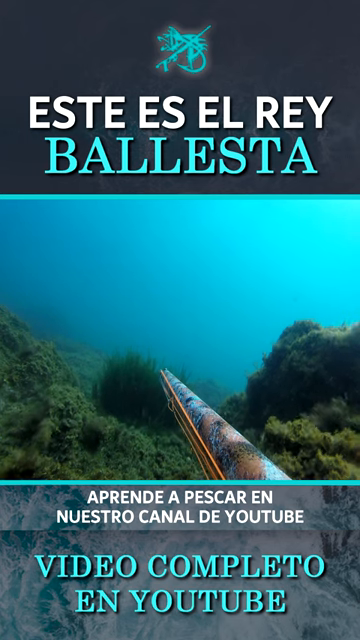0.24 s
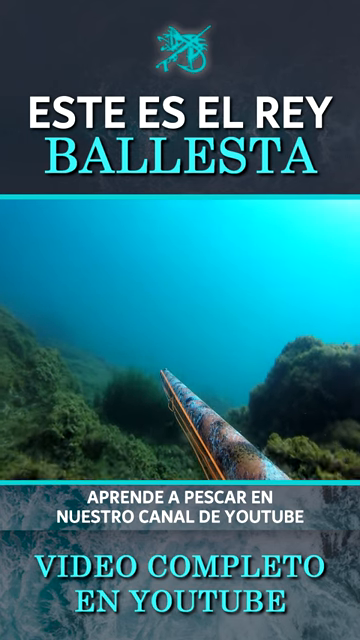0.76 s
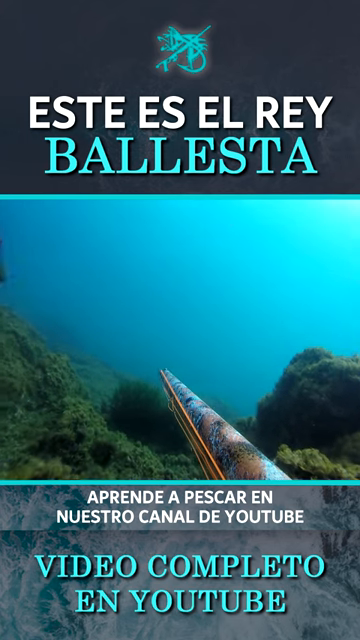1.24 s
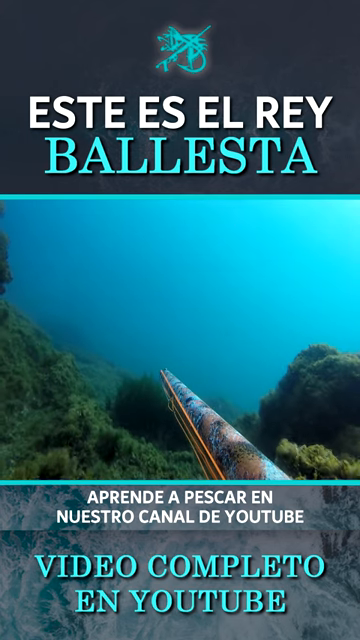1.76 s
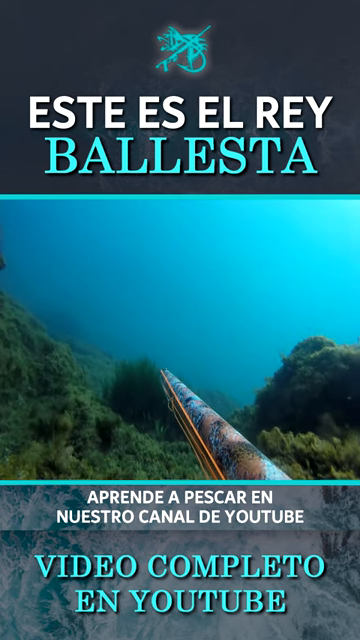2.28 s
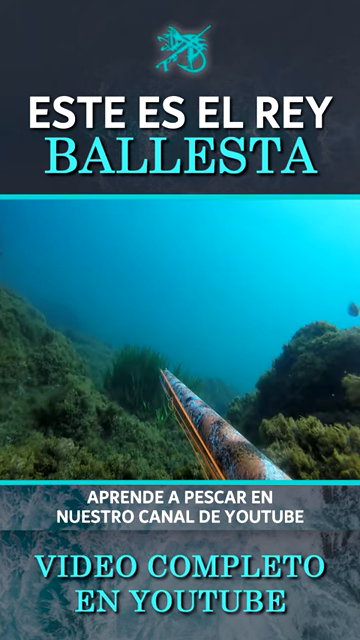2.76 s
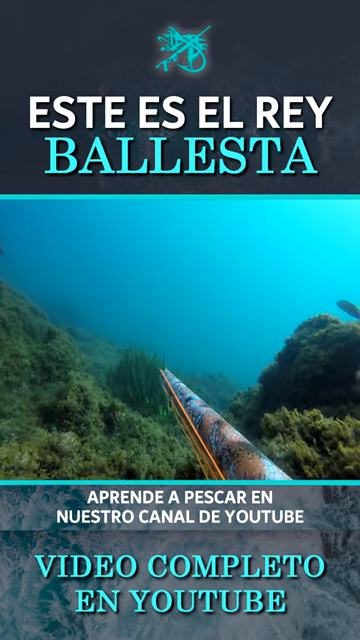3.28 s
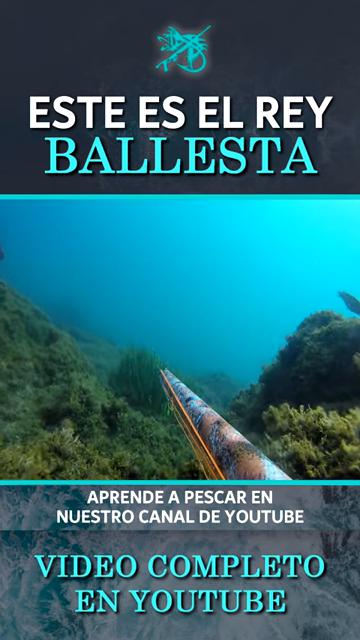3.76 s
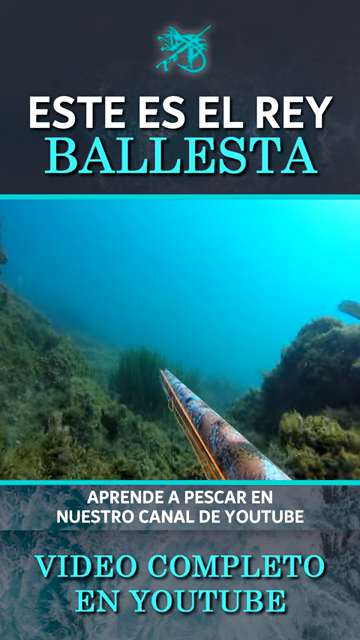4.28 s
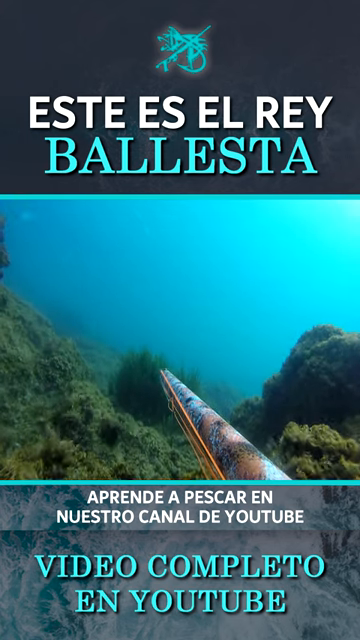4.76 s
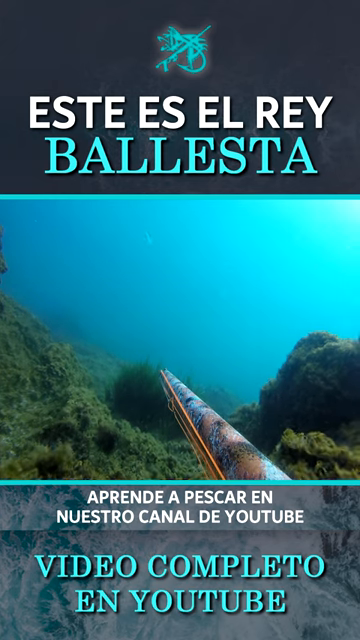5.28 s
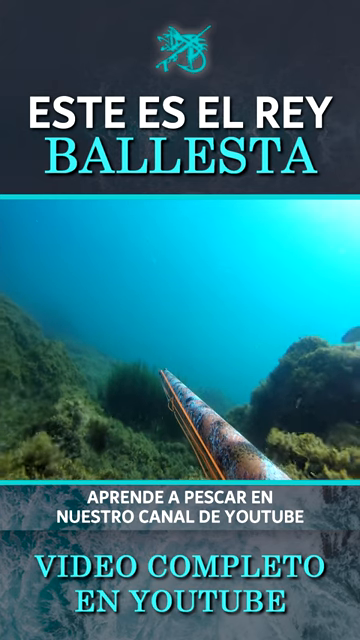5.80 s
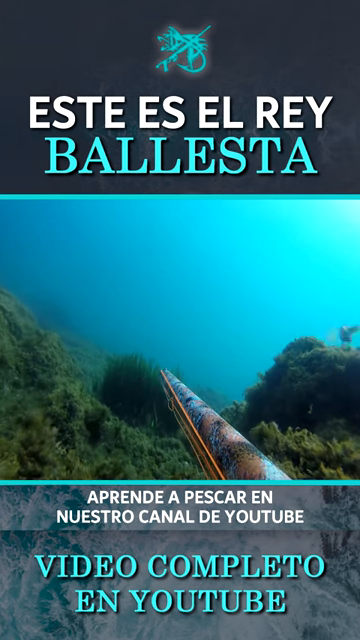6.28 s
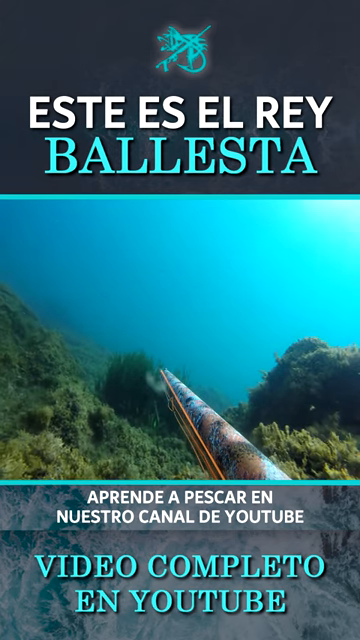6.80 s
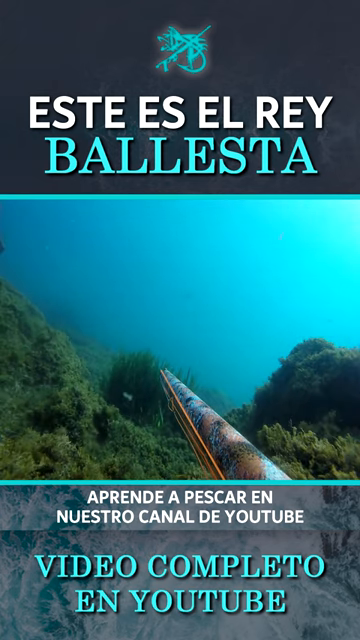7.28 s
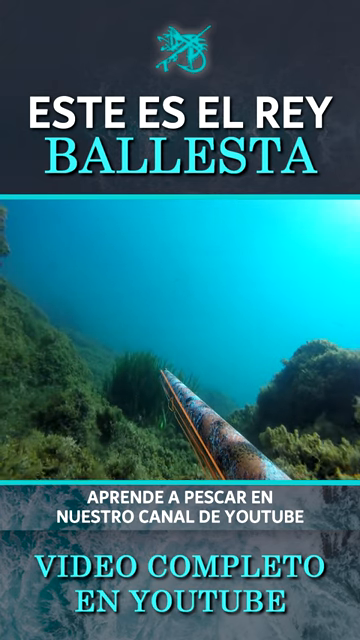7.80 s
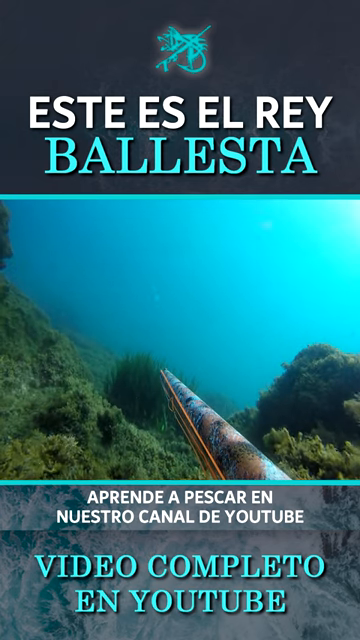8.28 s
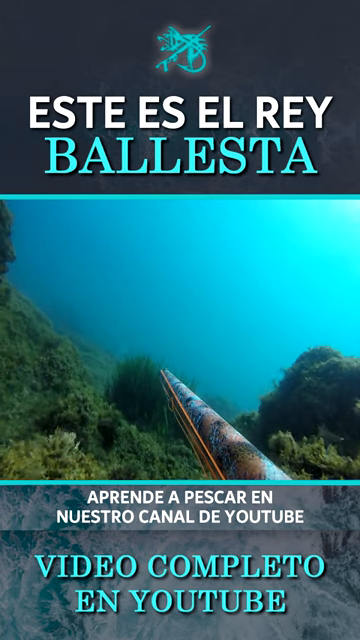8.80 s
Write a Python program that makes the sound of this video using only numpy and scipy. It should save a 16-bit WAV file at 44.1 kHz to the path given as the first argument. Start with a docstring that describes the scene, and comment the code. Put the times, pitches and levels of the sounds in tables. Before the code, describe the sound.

Underwater reef ambience: steady soft hiss and fine crackle, scattered sharp shrimp snaps, two hard dry cracks, dull handling knocks and low rumble.

```python
"""Snapping shrimp click near and far on a weedy reef, heard under water through a camera housing.
Each snap is a sharp pulse with smeared noise behind it, which rings the housing's resonances;
the far snaps merge into a crackling hiss. The housing sits on a speargun that is held ready:
the hand knocks and rubs on it, its stretched bands twang low and its barrel sways.
Slow filtered noise makes the rumble of moving water, and shaped steady noise the hiss of the sea."""
import sys
import numpy as np
from scipy import signal
from scipy.fft import rfft, irfft, next_fast_len
from scipy.io import wavfile

SR = 44100
rng = np.random.default_rng(int(sys.argv[2]) if len(sys.argv) > 2 else 0)


def inscribe(sig):
    """Save sig as 16-bit PCM at rate SR to the path in sys.argv[1].

    A 1-D sig is mono; a 2-D sig holds one channel per row.
    Samples are clipped to [-1, 1] before scaling.
    """
    pcm = np.round(np.clip(np.atleast_2d(sig).T, -1, 1) * 32767)
    wavfile.write(sys.argv[1], SR, pcm.astype(np.int16))


N = 399105
TIME = np.arange(N) / SR

# ways the speargun's body and stretched bands vibrate, lowest first:
# (pitch f/Hz, relative level/dB, time to fade by 60 dB t60/s)
GUN = [(74.84, 1.5, 0.6), (149, -5.5, 0.11), (228, -3, 0.12), (372, -5, 0.1), (516, -17.5, 0.027),
       (690, -3, 0.054), (768, -9, 0.12), (890, -36, 0.013)]
# hand movements that shift the gun:
# (start t/s, length/s, relative level of rubbing/dB, relative level of stirred water/dB)
MOVES = [(0, 0.079, -43.5, -33), (0.271, 0.14, -52.5, -43.5), (0.527, 0.096, -56.5, -40.5),
         (0.707, .2, -51.5, -46), (1.253, .35, -74, -52), (2.456, 0.038, -48, -37),
         (2.542, 0.095, -59, -36), (3.446, 0.59, -72, -48.5), (4.03, 0.14, -62, -43.5),
         (4.245, 0.26, -67, -51.5), (6.473, 0.099, -55, -47), (7.38, .25, -63.5, -49.5)]


def from_db(db):
    """Turn decibels into a gain."""
    return 10 ** (np.asarray(db) / 20)


def rms_one(x):
    """Scale a steady sound to an rms (average strength) of 1."""
    return x / np.sqrt(np.mean(x ** 2) + 1e-20)


def unit_burst(x):
    """Scale a short sound to the energy of ten milliseconds at rms 1."""
    return x / np.sqrt(np.sum(x ** 2) / (.01 * SR) + 1e-20)


def add(out, s, sound):
    """Mix a sound in at time s, in seconds."""
    i = int(np.clip(round(s * SR), 0, N - 1))
    out[i:i + len(sound)] += sound[:N - i]


def butter(x, hz, kind, order=2):
    """Butterworth filter: keeps a range of pitches and fades the rest."""
    return signal.sosfilt(signal.butter(order, hz, kind, fs=SR, output="sos"), x)


def resonate(x, hz, width):
    """One resonance with gain 1 at its peak; the narrower it is (in Hz), the longer it rings."""
    r = np.exp(-np.pi * width / SR)
    feed = np.array([1, 0, -1]) * (1 - r * r) / 2
    feedback = [1, -2 * r * np.cos(2 * np.pi * hz / SR), r * r]
    return signal.lfilter(feed, feedback, x)


def coloured_noise(spectrum):
    """Steady noise with the given balance of pitches, at rms 1."""
    hz, db = np.transpose(spectrum)
    size = next_fast_len(N, True)
    bins = np.maximum(np.fft.rfftfreq(size, 1 / SR), 1)
    gain = from_db(np.interp(np.log(bins), np.log(hz), db))
    return rms_one(irfft(rfft(rng.standard_normal(size)) * gain, size)[:N])


def housing(x, low=0, high=SR):
    """Water pressure rings the housing's resonances from low to high Hz; water keeps each ring short."""
    # resonances of the camera housing: (pitch f/Hz, width/Hz, relative level/dB)
    resonances = [(806, 99, 11.5), (1488, 27, 11.5), (1666, 65, 7), (1851, 140, 15), (2235, 200, 13.5),
                  (2436, 118, 13), (2674, 59.5, 19), (2750, 77, -35), (2950, 30, -35), (3360, 67, -29),
                  (4280, 430, 1.5), (4530, 760, -16), (4930, 160, -7), (6000, 300, -20), (7440, 1370, -3.5),
                  (7300, 2800, -9), (8500, 930, -34.5), (10400, 590, -14), (12000, 940, -12)]
    least_width_hz = 85
    ringing = sum(from_db(db) * resonate(x, hz, max(width, least_width_hz))
                  for hz, width, db in resonances if low <= hz < high)
    return butter(butter(ringing, 600, "high"), 13000, "low")


def crackle(per_s, size_db, largest, echo_t60, steady_power):
    """Noise whose power jumps at each random snap and then fades, over a steady floor."""
    size = from_db(size_db * np.minimum(rng.exponential(1, N), largest))
    snaps = (rng.random(N) < per_s / SR) * size
    # power that falls a millionfold in t60 is a fade of 60 dB
    power = signal.lfilter([1], [1, -from_db(-120 / (echo_t60 * SR))], snaps ** 2 + steady_power)
    return np.sqrt(power) * rng.standard_normal(N)


def far_shrimp(per_s=55, murmur=0.34, top_hz=7500, level_db=-58):
    """Distant snaps of uneven size, dulled by the water, each with a short echo over the merged chorus."""
    snaps = crackle(per_s, size_db=2.5, largest=3.1, echo_t60=0.063, steady_power=murmur * per_s / SR)
    return from_db(level_db) * rms_one(butter(housing(snaps), top_hz, "low"))


def fine_ticks(low_hz=5500, top_hz=11000, level_db=-76):
    """Tiny bright snaps in the weed close by, each dying away very quickly."""
    snaps = crackle(per_s=22, size_db=4.0, largest=5.6, echo_t60=.018, steady_power=1e-18)
    return from_db(level_db) * rms_one(butter(housing(snaps), [low_hz, top_hz], "band"))


def sea_hiss(level_db=-56.0):
    """The smooth, steady hiss of the sea is noise that weakens towards the treble."""
    # balance of the hiss: (pitch f/Hz, relative level in each Hz/dB)
    sea_spectrum = [(20, -5.5), (45, 1.5), (75, -0.5), (110, -2), (220, -5), (400, -8.5), (620, -11.5),
                    (790, -10.5), (1050, -15), (2700, -20), (5000, -26.5), (8200, -30), (11300, -37),
                    (15000, -42.5)]
    return from_db(level_db) * coloured_noise(sea_spectrum)


def gesture(start, length, t60):
    """Strength of one movement: it swells up to its start, holds for its length, then dies away."""
    attack_s = 0.034
    attack = np.clip(1 + (TIME - start) / attack_s, 0, 1)
    return attack * from_db(-60 * np.clip((TIME - start - length) / t60, 0, 2))


def rumble(flow_db=-1, calm_db=-58.5, settle_t60=.65):
    """Slow eddies press on the housing; each movement stirs up more of them, and they settle slowly."""
    eddies = rms_one(butter(rng.standard_normal(N), [12, 26], "band"))
    stirred = sum((from_db(push_db) * gesture(s, length, settle_t60)) ** 2
                  for s, length, rub_db, push_db in MOVES)
    # calm and stirred eddies add up as powers
    strength = np.sqrt(from_db(calm_db) ** 2 + stirred)
    return from_db(flow_db) * strength * eddies


def gun_modes(force):
    """A force on the gun sets each of its modes (ways of vibrating) ringing, lowest first."""
    return [resonate(force, hz, np.log(1000) / (np.pi * t60)) for hz, db, t60 in GUN]


def rubbing(level_db=-2, grain_db=4.0, slips_per_s=500, scrape_db=-2, release_t60=0.17):
    """While the hand moves, the glove slips in tiny jerks that feed the gun's modes and a dull scrape."""
    moments = rng.random(N) < slips_per_s / SR
    slips = moments * from_db(grain_db * rng.standard_normal(N)) * rng.choice([-1, 1], N)
    body = rms_one(sum(from_db(db) * rms_one(mode)
                       for (hz, db, t60), mode in zip(GUN, gun_modes(slips))))
    scrape = from_db(scrape_db) * rms_one(butter(slips, [60, 520], "band", order=1))
    effort = sum(from_db(rub_db) * gesture(s, length, release_t60)
                 for s, length, rub_db, push_db in MOVES)
    return from_db(level_db) * effort * (body + scrape)


def contact(t, length):
    """A brief rough contact: noise that dies away smoothly over about its length."""
    return rng.standard_normal(len(t)) * np.exp(-np.minimum(t / max(length, .001), 6) ** 2)


def knocks(ring_db=-4, thud_db=-1):
    """Brief rough contacts give a dull thud and shake the gun; the stretched bands ring on."""
    # knocks on the gun:
    # (time t/s, relative level/dB, length of contact/s, extra level of the lowest mode/dB)
    knock_list = [(.006, -43, 0.0073, 4), (.045, -46.5, 0.0094, 5.5), (.075, -45, 0.0098, -5),
                  (.775, -59, 0.026, 14.5), (2.446, -35, 0.0047, 0), (2.48, -50, 0.024, 8),
                  (2.536, -45, 0.0035, -19), (2.607, -53.5, 0.0048, 6.5), (4.04, -61, 0.013, 8.5),
                  (6.508, -47.5, 0.016, 4)]
    out, t = np.zeros(N), np.arange(SR * 3 // 4) / SR
    for s, db, length, low_db in knock_list:
        force = contact(t, length)
        thud = unit_burst(butter(force, [110, 950], "band", order=3))
        add(out, s, from_db(db + thud_db) * thud)
        for k, mode in enumerate(gun_modes(force)):
            mode_db = ring_db + db + GUN[k][1] + low_db * (k == 0)
            add(out, s, from_db(mode_db) * 2 * mode / np.abs(mode).max())
    return out


def snap_paths(t, spread, direct=0.24, echo_db=0.5, echo_t60=0.1, usual_spread=0.0078):
    """A collapsing cavity: a sharp pulse, a swelling cluster of paths off the rocks, the reef's echo."""
    # far snaps are more smeared and have more echo
    far = spread / usual_spread
    arrivals = rng.standard_normal(len(t)) * np.sqrt(rng.exponential(1, len(t)))
    cluster = (.65 + .4 * t / spread) * np.exp(-(t / (1.15 * spread)) ** 6)
    echo = from_db(echo_db - 60 * t / echo_t60) * min(far, 1.4) ** 1.7
    pulse = unit_burst(1. * (t == 0))
    return unit_burst(arrivals * (cluster + echo)) + direct * pulse


def near_shrimp(mid_db=-2, mid_follows=0.57):
    """Snaps ring the housing's three registers; brightness lifts the treble fully, the mids by a share."""
    # near snaps: (time t/s, level of the lowest register/dB, treble relative to it/dB,
    # spread of the arriving paths/s)
    snaps = [(0.06, -45, -36, 0.0021), (0.173, -41.5, -16.5, 0.0055), (0.5646, -43, -39, 0.0074),
             (0.7507, -46.5, -18, 0.0039), (1.0024, -44.0, -19, 0.0028), (1.1365, -43.5, -34, 0.0074),
             (1.4465, -43, -23, 0.024), (1.545, -47.5, -28, 0.0108), (1.7227, -45.5, -22, 0.0037),
             (1.7621, -45.0, -20.0, 0.0047), (2.2884, -32, -37, 0.0047), (2.2925, -25, -25.5, 0.0024),
             (2.6366, -41, -25, 0.0041), (2.645, -38, -17.5, 0.0043), (2.691, -53.5, -3.5, 0.0026),
             (2.914, -44, -29, 0.0083), (3.0548, -52.5, 2.5, 0.0016), (3.0743, -48, -4, 0.0088),
             (3.1759, -36.5, -32, 0.0051), (3.2247, -45.5, -8.5, 0.0042), (3.4173, -35, -26.5, 0.0082),
             (3.4855, -47, -18, 0.0025), (3.6703, -46.5, -25, 0.0081), (3.7626, -50.5, -5, 0.0051),
             (4.2965, -39.5, -20.5, 0.0089), (4.347, -43.5, -25, 0.012), (4.8, -48.5, -25, 0.01),
             (5.178, -41, -20.5, 0.011), (5.574, -46, -14, 0.0045), (5.6016, -42, -22, 0.016),
             (5.8686, -46, -23, 0.0115), (5.9138, -44.0, -18, 0.0062), (6.0372, -49.0, -16.0, 0.0051),
             (6.2185, -34.5, -28, 0.0085), (6.387, -48.0, -15, 0.0093), (6.5017, -39, -24, 0.005),
             (6.766, -41.5, -20, 0.0056), (6.8182, -34.5, -25, 0.0059), (6.882, -47, -4, 0.0031),
             (7.1981, -42.5, -10.5, 0.0054), (7.6055, -41.0, -11, 0.0044), (7.667, -46, -22, 0.004),
             (7.8474, -43.5, -21, 0.021), (7.928, -50, -9, 0.0055), (8.1758, -43.5, -35, 0.012),
             (8.2123, -27.5, -28, 0.0041), (8.331, -47.5, -17, 0.0075), (8.4046, -41, -15, 0.0042),
             (8.563, -31, -20.5, 0.0052), (8.6236, -47.5, -15.0, 0.0082), (8.7523, -43, -18.0, 0.014),
             (8.823, -46.0, -13.5, 0.012), (8.9869, -38, -18, 0.006)]
    # borders between the low, middle and treble registers: f/Hz
    edges = [0, 3400, 6000, 20000]
    out, t = np.zeros(N), np.arange(SR // 10) / SR
    for s, db, treble_db, spread in snaps:
        paths = snap_paths(t, max(spread, .001))
        register_db = (0, mid_db + mid_follows * treble_db, treble_db)
        for low, high, rel_db in zip(edges, edges[1:], register_db):
            ringing = butter(housing(paths, low, high), [max(low, 100), high], "band", order=3)
            add(out, s, from_db(db + rel_db) * unit_burst(ringing))
    return out


def barrel_sway(start_hz=33, rest_hz=19.8, slowing_s=0.069, fade_t60=0.58):
    """The pushed long barrel swings, slowing to its resting rate as it dies away."""
    # the push: (time t/s, length/s, level/dB)
    push = (.8, .12, -29)
    s, length, db = push
    hz = rest_hz + (start_hz - rest_hz) * np.exp(-np.maximum(TIME - s, 0) / slowing_s)
    swing = np.sin(2 * np.pi * np.cumsum(hz) / SR)
    return from_db(db) * gesture(s, length, fade_t60) * swing


def cracks(scatter_t60=0.022, peak_width_hz=800, bite_db=3):
    """A single close pulse, a smeared rebound off the gun and a little scatter, with almost no echo."""
    # dry cracks right beside the housing: (time t/s, level/dB, low edge f/Hz, bright peak f/Hz,
    # gain of that peak/dB, top edge f/Hz, delay of the rebound/s, gain of the lobe above the edge/dB)
    crack_list = [(1.6975, -17, 1670, 6600, -2.5, 6360, 0.0012, -24),
                  (5.0105, -21, 200, 4900, -5, 5630, 0.002, -10)]
    out, t = np.zeros(N), np.arange(SR // 10) / SR
    for s, db, low_hz, peak_hz, peak_db, top_hz, delay, lobe_db in crack_list:
        direct = unit_burst(1. * (t == 0))
        scatter = unit_burst(rng.standard_normal(len(t)) * from_db(-60 * t / scatter_t60))
        smear = np.exp(-(2 * (t - delay) / delay) ** 2)
        rebound = unit_burst(rng.standard_normal(len(t)) * smear)
        paths = direct + .28 * scatter + .6 * rebound
        bright = from_db(peak_db) * resonate(paths, peak_hz, peak_width_hz)
        bite = from_db(bite_db) * resonate(paths, 3630, 630)
        # the pulse's width leaves a hollow above its top edge, with a weaker lobe beyond
        pulse = butter(paths + bright + bite, low_hz, "high", order=1)
        pulse = butter(pulse, top_hz, "low", order=8)
        pulse += from_db(lobe_db) * butter(paths, 9000, "high", order=6)
        add(out, s, from_db(db) * unit_burst(housing(pulse)))
    return out


def taps(width_hz=320):
    """Soft contacts knock hollowly and stir mainly the housing's lowest resonances."""
    # dull taps of gear on the housing:
    # (time t/s, level/dB, pitch f/Hz, length of contact/s, ring of the housing relative to the knock/dB)
    tap_list = [(2.725, -49, 470, 0.011, -14), (3.669, -50, 760, .005, -12), (3.901, -50.5, 755, .005, -15),
                (4.087, -50, 780, .003, -12), (4.164, -48, 760, 0.013, -14),
                (4.204, -41.5, 754, 0.014, -10), (4.648, -53.5, 744, .005, -20),
                (7.683, -50, 335, 0.0028, -18), (7.687, -39, 607, 0.0033, -0.5)]
    out, t = np.zeros(N), np.arange(SR // 10) / SR
    for s, db, hz, length, ring_db in tap_list:
        hollow = butter(resonate(contact(t, length), hz, width_hz), 1100, "low", order=3)
        knock = unit_burst(butter(hollow, 830, "low"))
        ring = from_db(ring_db) * unit_burst(housing(hollow))
        add(out, s, from_db(db) * unit_burst(knock + ring))
    return out


def scene():
    """Shrimp, gun handling and moving water over the sea's hiss."""
    shrimp = far_shrimp() + fine_ticks() + near_shrimp() + cracks()
    # the camera mount passes only the dull part of what shakes the gun
    handling = butter(rubbing() + knocks(), 880, "low", order=7)
    water = sea_hiss() + rumble()
    return (shrimp + handling + water + barrel_sway() + taps())[None]


def record(dry):
    """The highest treble is cut off steeply."""
    cutoff_hz = 15400
    return signal.sosfilt(signal.ellip(10, .2, 70, cutoff_hz, fs=SR, output="sos"), dry)


dry = scene()
out = record(dry)
inscribe(out)
```